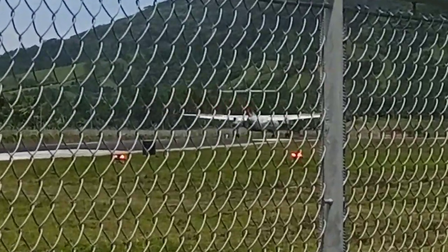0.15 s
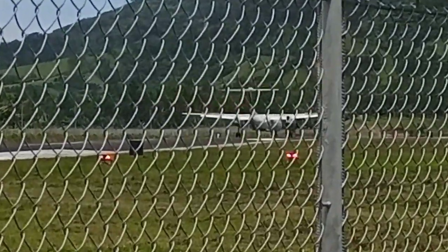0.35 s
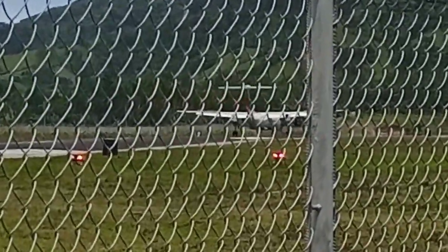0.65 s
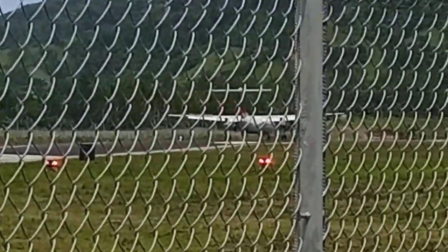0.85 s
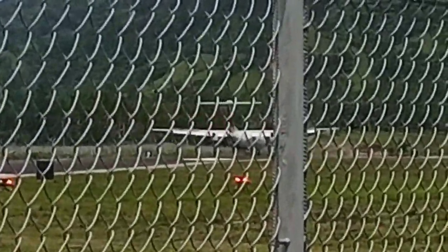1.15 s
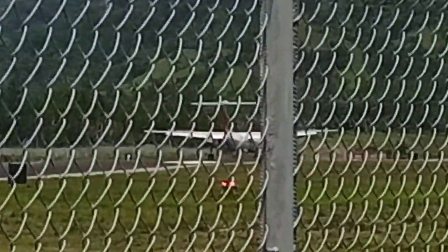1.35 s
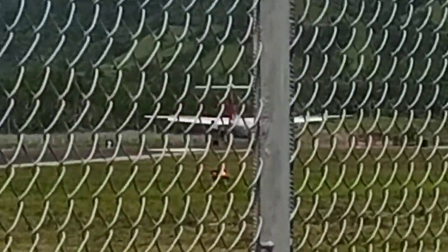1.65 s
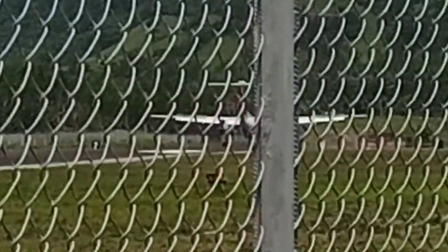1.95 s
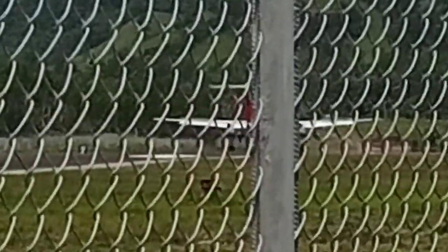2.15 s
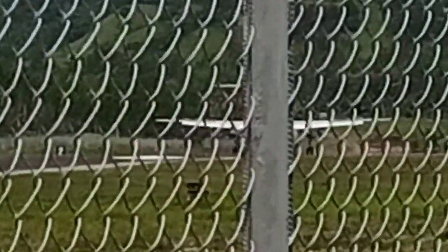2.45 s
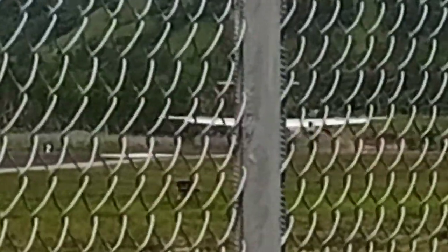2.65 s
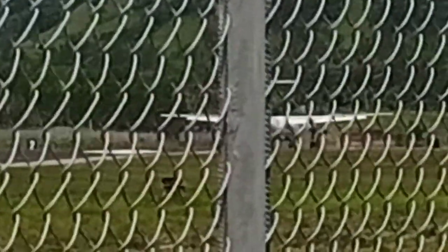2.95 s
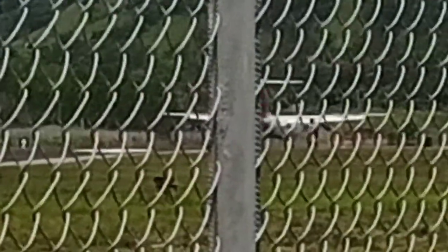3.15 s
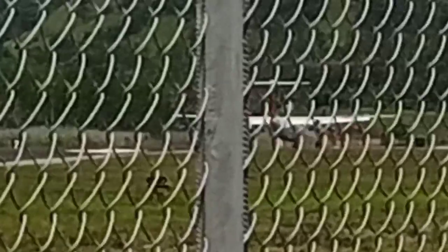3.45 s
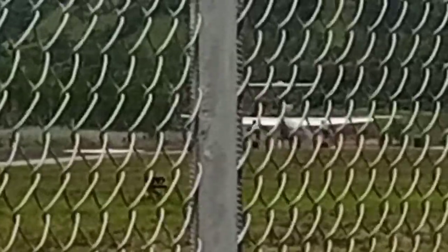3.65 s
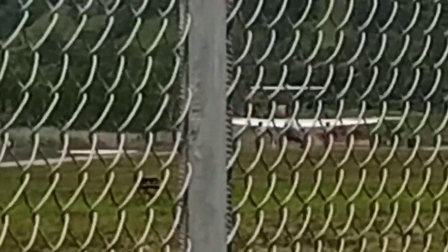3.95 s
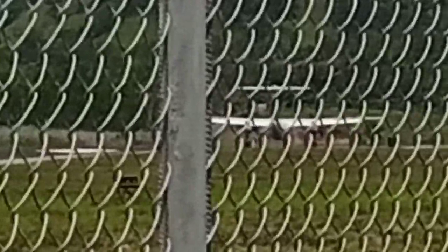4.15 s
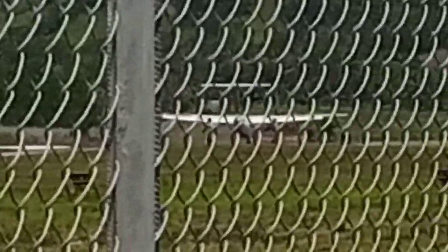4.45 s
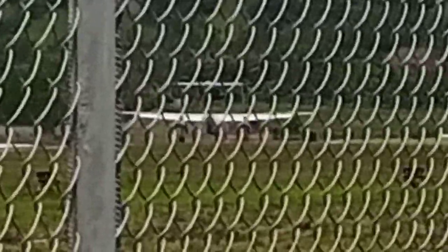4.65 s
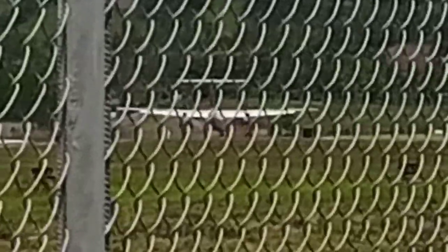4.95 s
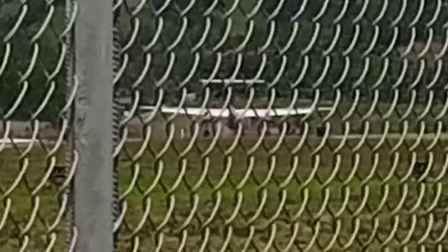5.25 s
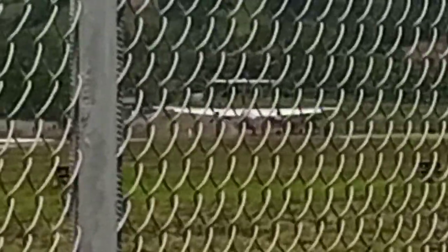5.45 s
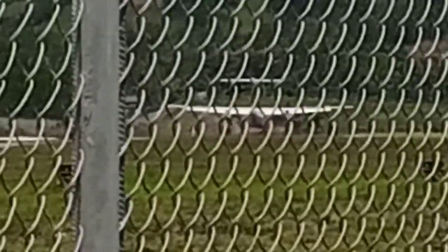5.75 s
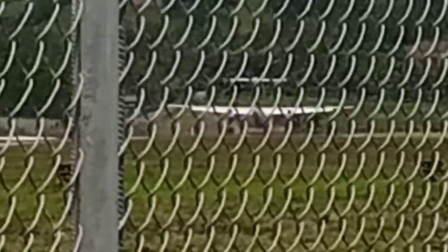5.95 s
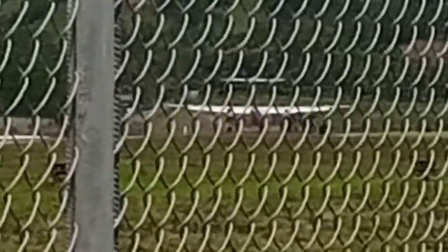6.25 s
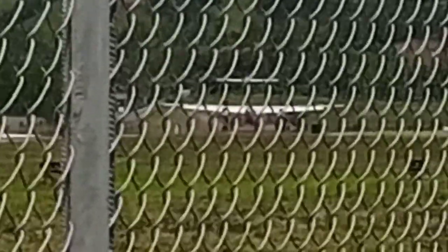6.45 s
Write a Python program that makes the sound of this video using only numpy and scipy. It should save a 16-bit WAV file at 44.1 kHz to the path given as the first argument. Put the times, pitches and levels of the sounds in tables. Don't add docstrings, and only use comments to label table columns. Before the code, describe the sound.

Open airfield, heard through a small phone microphone behind a fence. From 0 s a twin turboprop gives a moderate, airy roar with thin turbine hiss; a small bird chips faintly at about 6 kHz, mainly in the first second, and soft wind thumps tap the microphone, with a short low gust near 0.6 s. From 1 s the roar swells as the tail swings round, peaking around 1.5 to 2 s, while deep propeller rumble surges in, strongest from 1.7 to 2.6 s, lumpy and beating. The fuzzy blade note sinks from about 125 to 95 Hz by 4.4 s. From 2.5 s the roar falls and loses treble as the aircraft rolls away, with a few faint chips between 3.5 and 4.7 s. By 4.5 s a dull, distant drone remains, still fluttering, with wind thumps around 5 to 6.5 s and a faint fence-post moan near 6.4 s, ending at 6.6 s.

```python
import sys
import numpy as np
from scipy import signal
from scipy.io import wavfile
from scipy.ndimage import uniform_filter1d

SR = 44100
rng = np.random.default_rng(int(sys.argv[2]) if len(sys.argv) > 2 else 0)


def amplitude_ratio(level_db):
    exponent = np.asarray(level_db, float) / 20
    return 10 ** exponent


def master(y):
    cut = np.clip(np.atleast_2d(y).T, -1, 1)
    pcm = np.round(cut * 32767)
    wavfile.write(sys.argv[1], SR, pcm.astype(np.int16))


N = 290619

# centre_s, peak_db, pitch_hz, length_s
CHIPS = [(.08, -63, 5960, .015), (.135, -58, 6020, .02), (.38, -63, 5830, 0.072), (0.68, -50, 5950, 0.0092),
         (.72, -59, 6030, .015), (.838, -56, 5900, .005), (.93, -66, 5850, 0.027), (3.52, -65, 5870, .015),
         (3.78, -69, 5870, .02), (4.13, -69, 6000, .02), (4.263, -60, 6000, .013), (4.275, -65, 6050, .006),
         (4.288, -72, 6100, .008), (4.315, -69, 5940, .006), (4.644, -64, 5930, .009),
         (4.68, -72, 5950, .02), (2.4, -60, 6000, .02)]
# centre_s, peak_db, pitch_hz, length_s
THUMPS = [(0.187, -17.5, 118, 0.011), (0.264, -15.5, 108, 0.0089), (0.358, -18.5, 99, 0.012),
          (0.609, -8.5, 165, 0.008), (0.652, -20, 110, 0.0093), (1.432, -10, 149, 0.012),
          (2.019, -10, 118, 0.011), (2.259, -11.5, 118, 0.0076), (4.805, -17, 129, 0.0072),
          (5.234, -14.5, 130, 0.014), (5.356, -13.5, 105, 0.013), (5.54, -18, 91, .02),
          (5.17, -16, 100, 0.024), (5.994, -17, 134, 0.019), (6.239, -18, 110, 0.009),
          (4.05, -20, 100, .012), (6.51, -17, 100, 0.032)]
# time_s, pitch_hz, level_db
MOAN = [
    (6.25, 325, -56),
    (6.38, 325.4, -53),
    (6.43, 340, -33),
    (6.47, 335, -51),
    (6.5, 325, -37),
    (6.54, 315, -56),
]
# frequency_hz, density_db_per_hz
BREEZE = [(10, -6), (25, 3.5), (40, 7), (55, 0), (80, -38.5)]
# frequency_hz, density_db_per_hz
FLOOR = [(100, 0), (8000, 0), (8700, -5.5), (10500, -5), (11500, 0.5), (16000, 0.5)]

# frequency_hz, density_db_per_hz
RUMBLE = [(12, -62.5), (20, -31.5), (32, -42), (48, -32.5), (62, -6), (86, -0.5), (140, 1), (170, -1),
          (220, -32), (370, -120)]
# frequency_hz, density_db_per_hz
WASH = [(110, -17.5), (160, -4.5), (180, 2), (250, -4.5), (350, -7), (450, -11.5), (600, -24.5), (900, -58)]
# time_s, blade_rate_hz, share_of_rumble_db
BLADES = [(0, 123, -26), (1.3, 131, -14), (1.7, 123.1, 0), (2.1, 117.5, -2.5), (2.45, 108.8, 2.5),
          (2.8, 107.8, -4.5), (3.2, 100.3, -0.5), (3.6, 103.3, -3), (3.9, 95.7, -2.5), (4.4, 93.7, -8),
          (6.59, 102.3, -4)]
# time_s, level_db
PROPS = [(0, -36.5), (.5, -39), (.8, -34), (1.3, -34.5), (1.5, -26), (1.7, -18.5), (2.0, -15.5), (2.4, -16),
         (2.6, -17.5), (2.8, -21.5), (3.2, -19.5), (3.6, -22.5), (3.85, -28), (4.1, -26.5), (4.4, -30),
         (5.2, -29.5), (5.9, -31), (6.59, -30)]
# centre_s, gain_db
SURGES = [(1.38, 9), (1.59, 4), (1.63, -11), (1.69, 6), (1.78, 5), (1.82, -6), (1.85, 7), (2.03, -1),
          (2.13, -6.5), (2.42, -1), (2.46, 4), (2.6, 4), (2.7, -7), (2.79, 2), (2.83, -9), (2.94, 1.5),
          (3.04, -8), (3.08, 5), (3.32, -4), (3.74, 4), (3.82, -7), (4.18, -1), (4.24, 8), (4.29, -16),
          (4.72, 7.5), (4.77, -5), (5.76, 6.5), (6.02, 9), (6.15, -5), (6.52, 0)]
# centre_s, width_s, rumble_db, wash_db
GUST = (0.636, 0.044, 11.4, 8.1)
# centre_s, width_s, wash_db, upper_end_db
EDDIES = [(.3, .1, 2, 1.5), (1.0, .15, -3.5, 2.5), (1.4, 0.17, 4, -1), (1.85, 0.22, 1.5, 1.5),
          (1.55, .06, -1.5, 2.5), (2.25, .07, 1, -2), (2.45, 0.079, -4.5, 0), (2.8, 0.15, 3.5, -4),
          (3.45, 0.11, 0, -0.5), (4.85, 0.13, -2, -4.5), (5.25, .1, -6, 6), (5.5, 0.069, 0.5, 6),
          (6.13, 0.1, 3, 1), (6.4, 0.12, -1.5, 9)]

# time_s, level_db
EXHAUST = [(0, -38), (.2, -35.5), (.8, -32.5), (1.12, -25.5), (1.28, -23), (1.48, -20), (1.84, -19.5),
           (2.05, -23), (2.32, -24), (2.68, -26.5), (3.02, -30), (3.68, -30.5), (4.3, -34.5), (4.75, -32.5),
           (5.05, -33.5), (5.5, -35), (6.1, -37.5), (6.59, -37.5)]
# frequency_hz, density_db_per_hz
ROAR = [(250, -36.5), (500, -0.5), (1300, -1), (2100, -5), (2800, -10.5), (3300, -20), (4400, -25),
        (5200, -32.5), (6200, -47.5), (7000, -53)]
# low_lobe_db, treble_db
ROAR_MEANS = (-4.5, -15.5)
# frequency_hz, density_db_per_hz
HISS = [(3000, -9.5), (6000, 1.5), (7500, 2), (8000, -2), (8250, -23), (8600, -61)]
# centre_hz, width_hz, depth_db
DIPS = [(473, 107, 9.5), (1021, 113, 7.5), (1660, 113, 5), (2510, 75, 2.5), (3000, 84, 0.5),
        (4020, 230, 1.5), (4540, 80, 3)]
# centre_s, width_s, roar_db, low_lobe_db
CLIMAX = (1.76, 0.096, 0.67, 0.96)
# centre_s, width_s, gain_db
LIFTS = [
    (.45, 0.12, -1),
    (.8, 0.053, 2),
    (1.3, 0.1, 3.5),
    (1.64, 0.083, 5),
    (2.56, 0.035, 2),
    (3.05, .2, 3),
    (3.75, 0.16, 4.5),
    (4.25, 0.2, 7),
    (6.3, 0.5, 4.5),
]
# centre_s, width_s, slide_hz
LEAN = [
    (.4, .15, 32),
    (1.65, 0.088, -24.5),
    (4.098, 0.92, 38.5),
    (6.15, 0.071, 36),
]
# centre_hz, width_hz, gain_db, gain_db_per_100m
WHINE = (4330, 170, 1.3, 1)

ROLL_M_PER_S = 35.6
TURN_S, TURN_SPAN_S = 1.66, .2
LOBE_DB, LOBE_HZ = -5, 770
TREBLE_DB, TREBLE_DB_PER_100M, TREBLE_TURN_DB, TREBLE_FOLLOWS = -11.5, -2, -2.5, 0.96
HISS_DB, HISS_DB_PER_100M, HISS_TURN_DB, HISS_FOLLOWS = -27.5, -12, -4.5, 0.79
HISS_TILT_DB = -5
SURGE_S = 0.015
WASH_DB, WASH_PROPS, WASH_ROAR, WASH_DB_PER_100M = -20, 0.78, 0.44, -2.5
UPPER_DB, UPPER_PROPS, UPPER_ROAR, UPPER_DB_PER_100M = -11.5, -0.32, 0.35, 4
BREEZE_DB, CALM_DB = -46, -68


def evened(x):
    return x / np.sqrt(np.mean(x ** 2) + 1e-20)


def read(points, hz):
    f, value = np.transpose(points)
    return np.interp(np.log(hz + 1), np.log(f + 1), value)


def curves(rows, t):
    s, *columns = np.transpose(rows)
    return [np.interp(t, s, c) for c in columns]


def bell(x, centre, width):
    return np.exp(-((x - centre) / width) ** 2 / 2)


def away(t):
    return ROLL_M_PER_S * t / 100


def grid(size):
    return np.fft.rfftfreq(size, 1 / SR)[:, None], np.arange(4 * N // size + 5) * size / 4 / SR


def banded(db, hz, band):
    inside = (hz >= band[0]) & (hz < band[1])
    return db - 10 * np.log10((amplitude_ratio(db) ** 2 * inside).sum(0))


def noise(db, patchy_db, wide, long):
    real, imaginary, patches = rng.standard_normal((db.shape[1], db.shape[0], 3)).T
    patches = uniform_filter1d(patches, wide, 0)
    patches = evened(uniform_filter1d(patches, long, 1))
    size = 2 * (len(db) - 1.5)
    z = (real + 1j * imaginary) * amplitude_ratio(db + patchy_db * patches) * np.sqrt(4 / 3)
    return signal.istft(z, nperseg=size, noverlap=size * 3 // 4)[1][:N]


def resonate(x, hz, width):
    turn = np.exp(2j * np.pi * np.cumsum(hz) / SR)
    r = np.exp(-np.pi * width / SR)
    return 2 * (turn * signal.lfilter([1 - r], [1, -r], x / turn)).real


def add(mix, s, db, hz, length):
    t = np.arange(-2 * length, 2 * length, 1 / SR)
    part = mix[round((s - 2 * length) * SR):][:len(t)]
    part += amplitude_ratio(db) * np.exp(-(2 * t / length) ** 2 / 2) * np.cos(2 * np.pi * hz * t)


def bird():
    out = np.zeros(N)
    for row in CHIPS:
        add(out, *row)
    return out + 0.37 * np.roll(out, 430)


def wind():
    out, t = np.zeros(N), np.arange(N) / SR
    for s, db, hz, length in THUMPS:
        add(out, s + 0.01093, db - 3.5, hz, length)
    hz, db = curves(MOAN, t)
    sounding = (t > MOAN[0][0]) & (t < MOAN[-1][0])
    return out + sounding * amplitude_ratio(db) * np.sqrt(2) * np.sin(2 * np.pi * np.cumsum(hz) / SR)


def propeller_rumble():
    hz, frames = grid(size=2048)
    blade_hz, share_db = curves(BLADES, np.arange(N) / SR)
    broad = evened(noise(read(RUMBLE, hz) + 0 * frames, patchy_db=0.5, wide=2, long=6))
    note = resonate(rng.standard_normal(N), blade_hz, width=22)
    note = evened(resonate(note, blade_hz, width=22))
    share = np.clip(amplitude_ratio(share_db), 0, .95)
    rumble = share * note + np.sqrt(1 - share ** 2) * broad
    slow = uniform_filter1d(uniform_filter1d(rumble ** 2, 4000), 4000)
    return evened(rumble / (slow + .05) ** 0.41)


def propeller_wash():
    hz, t = grid(size=2048)
    props, roar = curves(PROPS, t)[0] + 20, curves(EXHAUST, t)[0] + 20
    gust_s, gust_width_s, _, gust_db = GUST
    wash_db = WASH_DB + WASH_PROPS * props + WASH_ROAR * roar + WASH_DB_PER_100M * away(t)
    wash_db = wash_db + gust_db * bell(t, gust_s, gust_width_s)
    wash_db = wash_db + sum(db * bell(t, s, width) for s, width, db, _ in EDDIES)
    upper_db = UPPER_DB + UPPER_PROPS * props + UPPER_ROAR * roar + UPPER_DB_PER_100M * away(t)
    upper_db = upper_db + sum(db * bell(t, s, width) for s, width, _, db in EDDIES)
    wash = banded(read(WASH, hz), hz, (165, 290)) + wash_db
    wash = wash + np.clip((hz - 260) / 80, 0, 1) * (upper_db + 6.5) - 2.0
    breeze_power = amplitude_ratio(BREEZE_DB + 0.56 * wash_db) ** 2 + amplitude_ratio(CALM_DB) ** 2
    both_db = 10 * np.log10(amplitude_ratio(wash) ** 2 + amplitude_ratio(read(BREEZE, hz)) ** 2 * breeze_power)
    return noise(both_db, patchy_db=1.46, wide=3, long=5)


def propellers():
    t = np.arange(N) / SR
    gust_s, gust_width_s, gust_db, _ = GUST
    surge_db = sum(db * bell(t, s, SURGE_S) for s, db in SURGES)
    surge_db = surge_db + gust_db * bell(t, gust_s, gust_width_s)
    beat = amplitude_ratio(curves(PROPS, t)[0] + surge_db) * propeller_rumble()
    beat = signal.sosfilt(signal.butter(6, 62, "high", fs=SR, output="sos"), beat)
    return beat + propeller_wash()


def reflection_comb(hz, t):
    wander = rng.standard_normal((len(t), len(DIPS)))
    wander = evened(uniform_filter1d(wander, size=50, axis=0))
    comb_db = 0
    for k, (centre_hz, width_hz, depth_db) in enumerate(DIPS):
        depth = depth_db * (1 + .16 * wander[:, k])
        comb_db = comb_db - depth * bell(hz, centre_hz + 32 * wander[:, k - 1], width_hz)
    return comb_db


def exhaust():
    hz, t = grid(size=1024)
    roar_db = uniform_filter1d(curves(EXHAUST, t)[0], size=9)
    turned = (1 + np.tanh((t - TURN_S) / TURN_SPAN_S)) / 2
    low_db = LOBE_DB + sum(db * bell(t, s, width) for s, width, db in LIFTS)
    slide_hz = sum(slide * bell(t, s, width) for s, width, slide in LEAN)
    treble_db = TREBLE_DB + TREBLE_DB_PER_100M * away(t) + TREBLE_TURN_DB * turned
    treble_db = treble_db + (TREBLE_FOLLOWS - 1) * (roar_db + 30.5)
    hiss_db = HISS_DB + HISS_DB_PER_100M * away(t) + HISS_TURN_DB * turned
    hiss_db = hiss_db + (HISS_FOLLOWS - 1) * (roar_db + 29)

    climax_s, climax_width_s, climax_db, climax_low_db = CLIMAX
    aimed = bell(t, climax_s, climax_width_s)
    roar_db = roar_db + climax_db * aimed
    low_db = low_db + climax_low_db * aimed

    lean_db = 0.051 * slide_hz * (hz - LOBE_HZ) / 100 * np.exp(-((hz - LOBE_HZ) / 260) ** 2)
    roar = banded(read(ROAR, hz) + reflection_comb(hz, t) + lean_db, hz, (1050, 2400))
    low_reach = np.clip((1150 - hz) / 250, 0, 1) * np.clip((hz - 400) / 250, 0, 1)
    air_reach = np.clip((hz - 1900) / 1800, 0, 2)
    roar = roar + low_reach * (low_db - ROAR_MEANS[0]) + air_reach * (treble_db - ROAR_MEANS[1])
    whine_hz, whine_width_hz, whine_db, whine_db_per_100m = WHINE
    roar = roar + (whine_db + whine_db_per_100m * away(t)) * bell(hz, whine_hz, whine_width_hz)

    hiss = banded(read(HISS, hz), hz, (6300, 7900)) + hiss_db
    hiss = hiss + HISS_TILT_DB * away(t) * (hz - 6500) / 1000
    both_db = 10 * np.log10(amplitude_ratio(roar) ** 2 + amplitude_ratio(hiss - 1.0) ** 2)
    return noise(both_db + roar_db - .3, patchy_db=1.12, wide=5, long=12)


def scene():
    return (bird() + wind() + propellers() + exhaust())[None]


def top_cut(x):
    return signal.sosfilt(signal.butter(12, 15480, fs=SR, output="sos"), x)


def record(dry):
    cut = signal.sosfilt(signal.butter(2, 55, "high", fs=SR, output="sos"), dry)
    push = abs(cut) - uniform_filter1d(abs(cut), size=16000)
    cut = cut + .06 * signal.sosfilt(signal.butter(3, 18, fs=SR, output="sos"), push)
    edge = signal.firwin(201, 8090, window=("kaiser", 9), fs=SR)
    band = signal.oaconvolve(cut * signal.windows.tukey(N, 500 / N), edge[None], "same")
    hz, frames = grid(size=1024)
    floor = evened(noise(read(FLOOR, hz) + 0 * frames, patchy_db=1.5, wide=4, long=4))
    loudness = np.sqrt(abs(uniform_filter1d(band ** 2, size=9000)))
    floor = floor * np.hypot(amplitude_ratio(-96), .012 * loudness / 100)
    return top_cut(band + floor)


dry = scene()
out = record(dry)
master(out)
```